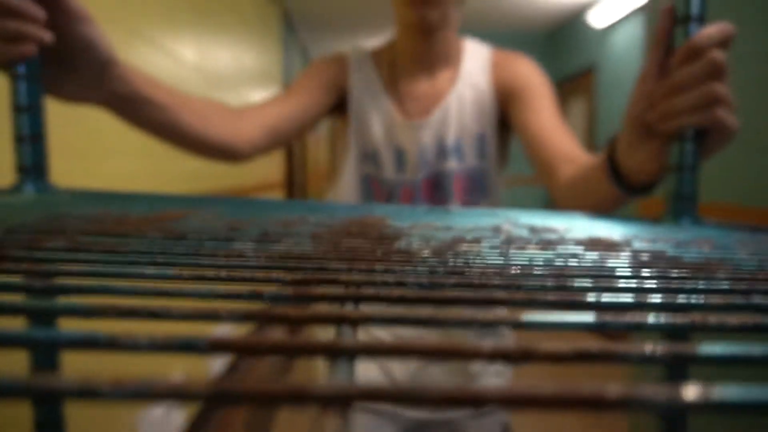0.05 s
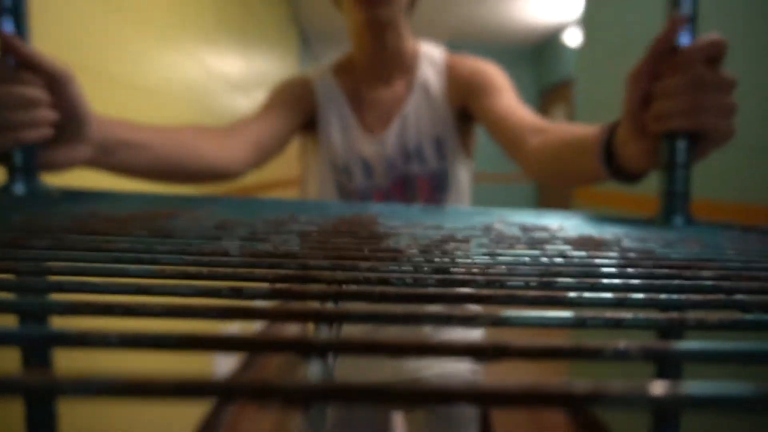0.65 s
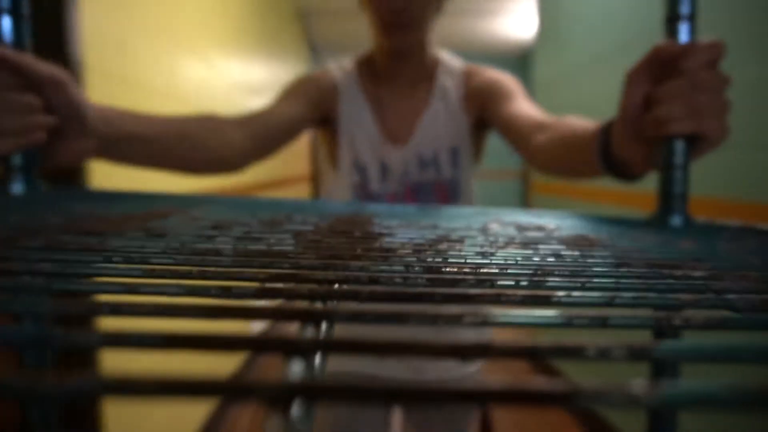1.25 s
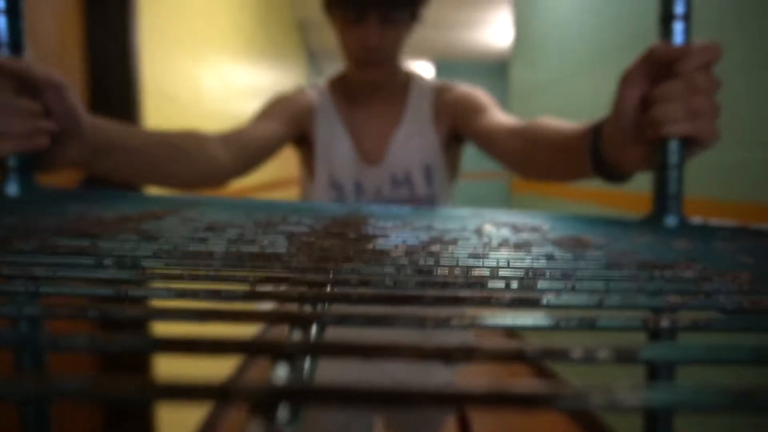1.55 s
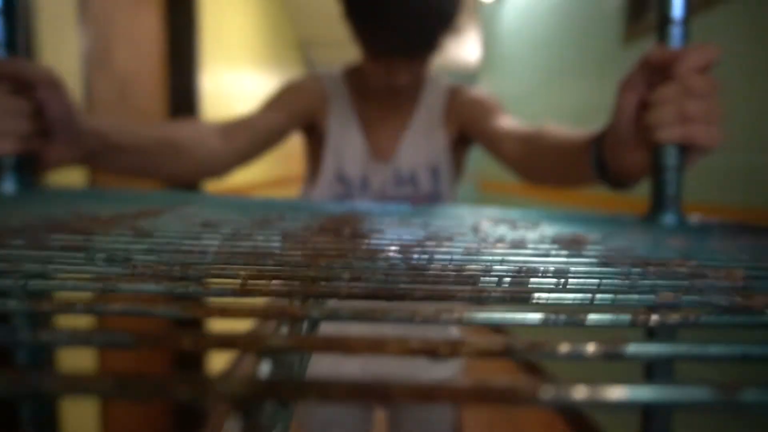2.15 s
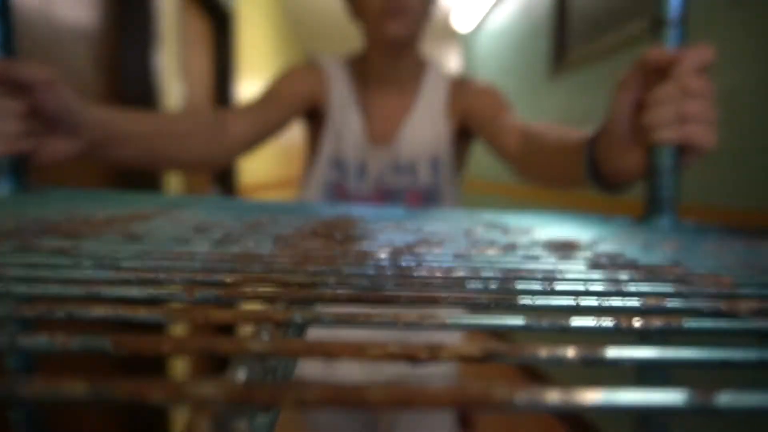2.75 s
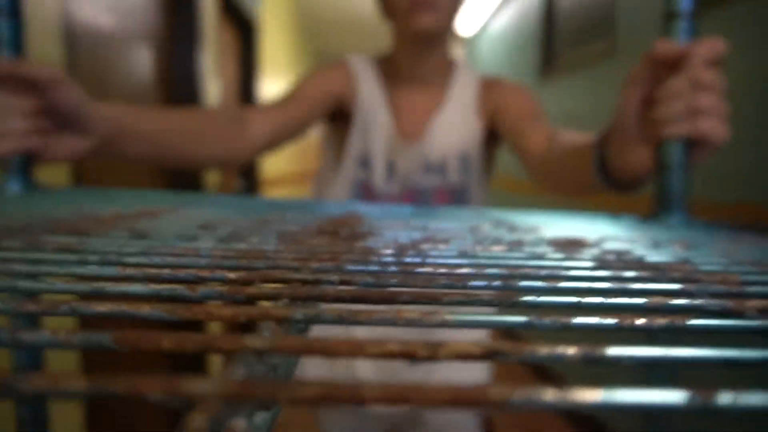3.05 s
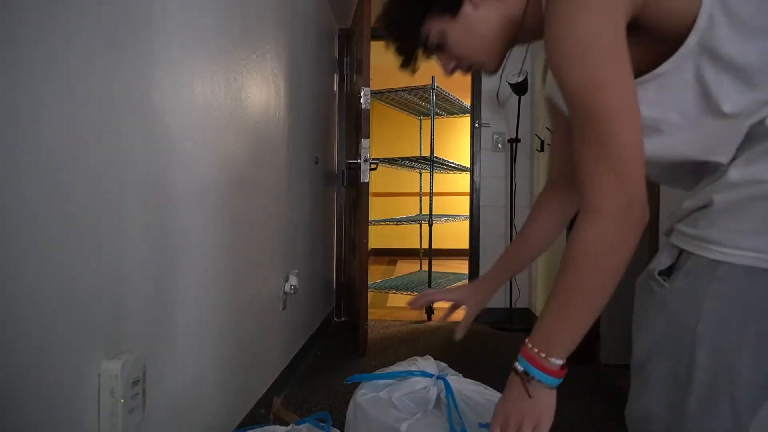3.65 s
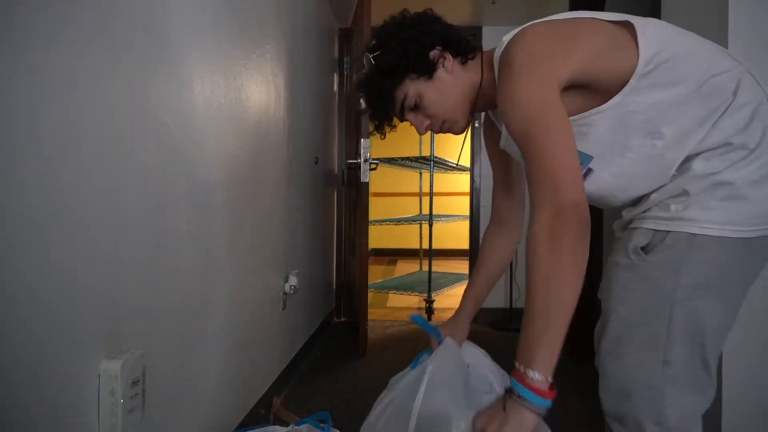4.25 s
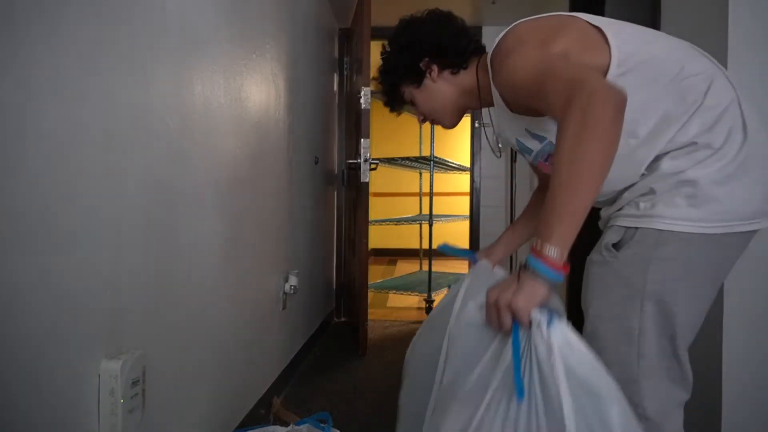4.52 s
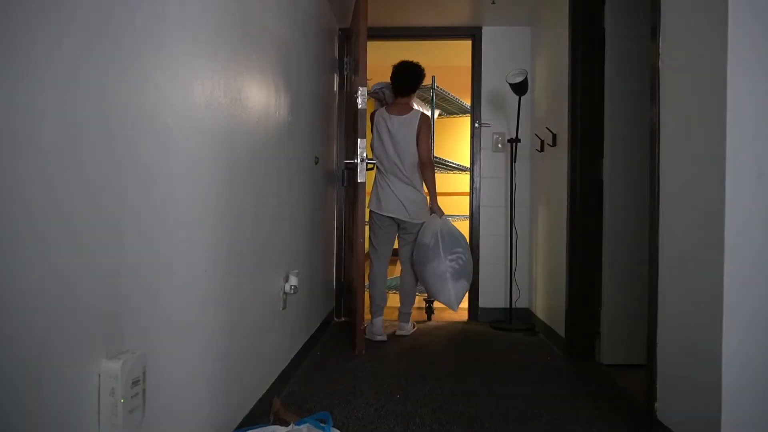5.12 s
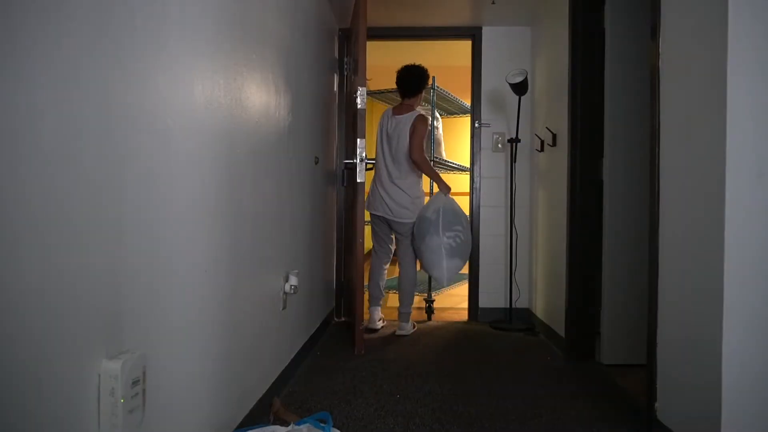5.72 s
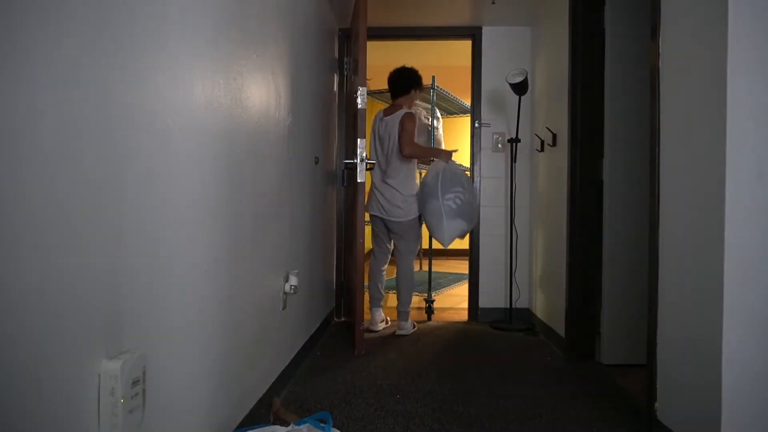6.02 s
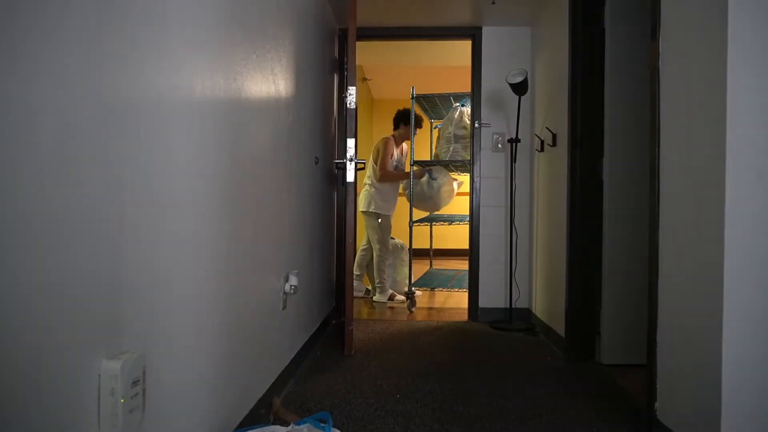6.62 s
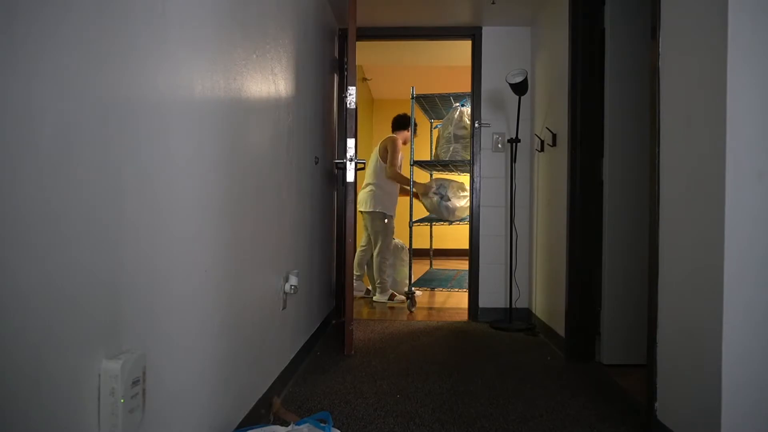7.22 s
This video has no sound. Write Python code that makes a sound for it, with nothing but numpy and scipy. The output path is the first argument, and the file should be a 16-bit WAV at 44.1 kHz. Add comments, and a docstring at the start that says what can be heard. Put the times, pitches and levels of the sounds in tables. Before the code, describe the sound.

With the microphone riding on it, a metal rack rumbles along on castors while its shelves rattle and knock irregularly. A wheel scuffs briefly and the rolling dies away. In a quiet hallway with a faint hum, a hand slaps into a full plastic bag nearby; the plastic crinkles and the load shifts with a hollow rustle. The rustling softens as the bag is carried off, then swells as it is shoved onto a lightly clinking wire shelf.

```python
"""Indoors, on an uneven floor and then in a hallway. A wire shelving rack rolls along, heard from on board:
grit jolts the castors, the frame rumbles, loose shelves chatter and knock, and thin wires jingle.
The rumble fades and a full plastic bag is grabbed close by, carried off and pushed onto a wire shelf.
Its creases crinkle and its load shifts with a hollow rustle, over soft air and a faint mains hum."""
import sys
import numpy as np
from scipy import signal
from scipy.fft import rfft, irfft
from scipy.io import wavfile
from scipy.ndimage import uniform_filter1d, minimum_filter1d

SR = 44100
rng = np.random.default_rng(int(sys.argv[2]) if len(sys.argv) > 2 else 0)


def master(y):
    """Save y as 16-bit WAV."""
    cut = np.clip(np.atleast_2d(y).T, -1, 1)
    pcm = np.round(cut * 32767)  # scale
    wavfile.write(sys.argv[1], SR, pcm.astype(np.int16))


N = 321048
T = np.arange(N) / SR

# The rumble holds steady, then fades. Each row: time in seconds, level in dB.
RUMBLE_LEVEL = [(.01, -15), (.1, -9.3), (.55, -11.5), (.95, -10.5), (1.4, -11), (2.05, -10.5), (2.7, -10.5),
                (2.95, -10), (3.42, -15), (3.6, -29.5), (3.66, -56)]
# Tone of the shaken frame. Each row: frequency in Hz, relative level in dB.
FRAME_COLOUR = [(20, -50), (33, -25), (44, -6.5), (62, -3), (102, -1.3), (124, 0.5), (198, -6),
                (250, -12.5), (325, -15), (440, -18), (540, -27), (708, -36.5), (1100, -44.5)]
# Posts and shelves bending. Each row: pitch in Hz, time to fall 60 dB in seconds, relative level in dB.
FRAME_MODES = [(44.85, 0.46, -20.5), (98.3, 0.105, -10), (119.45, 0.407, -3), (148.95, 0.288, -9),
               (202.4, 0.31, -17)]
# How hard the shelves chatter. Each row: time in seconds, level in dB.
CHATTER_LEVEL = [(0, -35.5), (.33, -32.5), (.52, -37), (.95, -32.8), (1.45, -34.2), (1.85, -35.5),
                 (2.05, -33.3), (2.75, -34.2), (3.02, -33.8), (3.4, -38.5), (3.55, -46.5)]
# Shelves tapping in their sockets. Each row: frequency in Hz, relative level in dB.
SOCKET_COLOUR = [(300, -11), (700, -3), (1000, 0.5), (1600, -2), (2000, -2.5), (2450, -6), (3000, -1),
                 (3900, -11), (4700, -8.5), (5600, -14.5), (8000, -12.5), (11000, -24.5), (15000, -31)]
# The wires jingle in swells of their own. Each row: time in seconds, level in dB.
JINGLE_LEVEL = [(.05, -43), (.33, -35.5), (.52, -41), (.72, -41.5), (.98, -36.5), (1.85, -40.5), (2.1, -37),
                (2.7, -42), (3.17, -38), (3.5, -49.5)]
# Sheen of the thin wires. Each row: frequency in Hz, relative level in dB.
WIRE_COLOUR = [(2000, -2.5), (4500, -4.5), (5600, -4.5), (7000, -1.5), (8800, -1), (10000, -4),
               (11700, -10.5), (12600, -22), (15500, -18)]
# A wire shelf ringing. Each row: pitch in Hz, time to fall 60 dB in seconds, relative level in dB.
WIRE_MODES = [(1943, 0.11, -4), (2700, .07, -3.5), (2981, 0.1, -1.5), (3440, 0.07, -1.5), (3890, .06, -4),
              (4840, 0.07, -2), (5930, 0.1, -6), (6790, .1, -6), (8090, .15, -5), (9397, 0.25, -6.5)]
# The hardest shelf knocks. Each row: start in seconds, strength in dB, brightness in Hz.
HARD_KNOCKS = [(0.168, -18, 1200), (0.233, -15.5, 2400), (0.3803, -15, 6700), (0.5785, -16, 1900),
               (0.778, -15.5, 900), (0.8016, -13.5, 3700), (0.854, -17, 3800), (0.902, -14, 1700),
               (0.9635, -16.5, 2400), (1.045, -17, 3800), (1.1765, -13.5, 3000), (1.291, -17, 5500),
               (1.5687, -13.7, 6500), (1.709, -17, 1400), (1.7439, -15, 1200), (1.8385, -15.5, 1600),
               (1.8645, -16.5, 1400), (2.04, -17, 2000), (2.056, -15.5, 1100), (2.2425, -12.3, 1900),
               (2.267, -17, 6500), (2.336, -16.5, 1210), (2.4655, -10.5, 4500), (2.531, -16, 5000),
               (2.6, -17.5, 1800), (2.6383, -17, 2200), (2.768, -17.5, 5000), (2.8322, -13, 2200),
               (2.8679, -17, 6400), (2.9015, -17, 2200)]
# Tone of a struck post. Each row: frequency in Hz, gain in dB.
POST_COLOUR = [(200, 12), (500, 4.5), (1000, 0), (2200, -1), (3000, 4), (3900, -1), (9000, 4.5),
               (15000, -6.5)]
# A castor scuffing as it swivels. Each row: time in seconds, level in dB.
SCUFF_LEVEL = [(2.9, -50), (2.99, -35), (3.05, -38.5), (3.1, -52)]
# Tone of that scuff. Each row: frequency in Hz, relative level in dB.
SCUFF_COLOUR = [(900, -14), (1500, -4), (2100, 0), (3100, -5), (4500, -18)]

# The bag is grabbed, gathered, lifted, carried and pushed in. Each row: crest in seconds,
# crinkle level in dB, load level in dB, seconds to rise 20 dB, seconds to fall 20 dB.
TUGS = [(3.6, -38, -53, .07, 0.4), (3.77, -37.5, -58, 0.09, 1.1), (3.865, -24, -27.5, 0.045, 0.24),
        (4.035, -23.5, -31.5, 0.07, 0.38), (4.25, -33, -41, 0.0549, .5), (4.4, -33.5, -39, 0.15, 0.1047),
        (4.51, -41.5, -37.5, 0.11, 0.2042), (4.62, -41, -43.5, 0.02, 0.24),
        (5.04, -42.5, -44.5, 0.02, 0.37), (5.14, -42, -48, .18, 0.43), (5.43, -33, -36, 0.39, 0.33),
        (5.93, -43.5, -50, 0.56, 0.5), (6.34, -41.3, -43, 0.25, 0.1848), (6.48, -37.5, -50, 0.21, 0.3039),
        (6.66, -43, -52, 0.18, .28), (6.875, -41, -46.5, 0.0433, 0.32), (6.95, -28.5, -35.5, 0.0778, .17),
        (7.012, -30, -37, 0.06, .2), (7.112, -29.8, -35, 0.14, 0.42)]
# Plastic film crinkling close by. Each row: frequency in Hz, relative level in dB.
NEAR_FILM_COLOUR = [(600, -30), (1100, 0.5), (1600, -2), (2400, -2), (3200, 0), (4800, -3), (5500, -2),
                    (8800, -1), (11400, -7.5), (15600, -26)]
# The same film down the hall. Each row: frequency in Hz, relative level in dB.
FAR_FILM_COLOUR = [(600, -18.5), (1100, -5), (1700, -4), (2400, -2.5), (3200, -1), (4800, -2.5), (5700, -3),
                   (8800, -4), (11400, -12.5), (13000, -24), (15600, -25)]
# Hollow rustle of the load. Each row: frequency in Hz, relative level in dB.
LOAD_COLOUR = [(100, -25), (180, -0.5), (260, -3), (400, 2.5), (550, 1), (750, 1), (1200, -5), (2000, -21),
               (4000, -31.5)]
# A hand slapping into the bag. Each row: start in seconds, peak in dB, time to fall 60 dB in seconds.
SLAPS = [(3.829, -9, 0.11), (3.8408, -1, 0.06), (3.851, -5.5, 0.026), (3.871, -12, 0.08)]
# Tone of a slap. Each row: frequency in Hz, relative level in dB.
SLAP_COLOUR = [(80, 1), (200, -5), (350, 0), (550, -6), (820, 3), (1050, 4), (1300, -4), (1750, 1.5),
               (3200, 1), (5000, 0), (9000, 0), (12000, -12), (15500, -31)]
# Single creases snapping. Each row: start in seconds, peak in dB.
SNAPS = [(3.73, -15), (3.7548, -13), (3.81, -14), (4.123, -13), (4.1589, -9.5), (4.2085, 1), (4.351, -13),
         (4.367, -14), (4.4213, -15), (4.7231, -22), (4.866, -28), (4.91, -29)]
# Tone of a snap. Each row: frequency in Hz, relative level in dB.
SNAP_COLOUR = [(300, -9.5), (700, 3.5), (1500, -4.5), (3000, -1.5), (4600, 6), (5500, -2), (7200, -4),
               (9200, 2), (12000, -13), (15500, -13.5)]
# Soft bumps of the load. Each row: start in seconds, pitch in Hz, peak in dB, seconds to fall 60 dB.
BUMPS = [(3.846, 790, -19, .045), (3.853, 348, -19, 0.12), (4.329, 696, -27, 0.05),
         (4.485, 270, -28.5, 0.26), (5.41, 301, -32, 0.39), (6.94, 238, -23, 0.36), (6.995, 288, -26, 0.26),
         (7.1, 517.5, -29, 0.57)]
# The bag nudging the wire shelf. Each row: start in seconds, strength in dB.
CLINKS = [(6.353, -28), (6.375, -30), (6.47, -28), (6.8635, -22.5), (6.888, -24), (6.965, -18.5),
          (7.11, -26)]

# Still air of the hallway. Each row: frequency in Hz, relative level in dB.
AIR_COLOUR = [(30, -19), (70, 0.5), (120, 2), (250, 0.5), (450, -2.5), (750, -5.5), (1200, -13),
              (2000, -21), (3200, -19.5), (8000, -20), (15000, -31)]
# Mains hum. Each row: pitch in Hz, typical rms level in dB.
HUM = [(119.5, -54), (241, -55)]

SURGE_DB, SURGES_PER_S = 0.5, 7.97  # the uneven floor makes the rumble swell and sag
RUMBLE_LEVELLING, LEVELLING_WINDOW_S = 0.55, 0.07
HEAVE_RUMBLE_DB, HEAVE_CHATTER_DB, HEAVE_RISE_S, HEAVE_SETTLE_S = 2, 0.6, 0.0059, 0.0455
KNOCKS_PER_S, KNOCK_OVER_CHATTER_DB, KNOCK_SPREAD_DB = 5, 12, 1.2
KNOCK_BRIGHT_HZ, KNOCK_SPREAD_OCTAVES = 1710, 0.64
BAG_START_S, BAG_FADE_IN_S = 3.55, 0.036
SWAY_FILM_DB, SWAY_LOAD_DB = -52, -55.5  # the faint rustle between tugs
SLAP_RISE_S = 0.002  # the film gives way under the hand
LOW_CUT_HZ, HIGH_CUT_HZ, LIMITER_CEILING = 39, 15800, 0.85


def rack():
    """Floor grit jolts the castors; the frame booms, and its widest swings rattle shelves and wires."""
    jolts = grains(rate=650, spread_db=3.0)
    frame = frame_boom(jolts)
    taps = shelf_taps(jolts, frame)
    wires = wire_jingle(taps)
    upset = heave()
    chatter_db = curve(CHATTER_LEVEL) + HEAVE_CHATTER_DB * upset
    rattle = (coloured(taps, SOCKET_COLOUR) * undb(chatter_db) + wires) * during(CHATTER_LEVEL, 0.065)
    rumble_db = curve(RUMBLE_LEVEL) + HEAVE_RUMBLE_DB * upset + SURGE_DB * walk(SURGES_PER_S)
    rumble = frame * undb(rumble_db) * during(RUMBLE_LEVEL, fade_s=0.03)
    return rumble + rattle + shelf_knocks() + castor_scuff()


def frame_boom(jolts):
    """Jolts set the frame ringing; the boom is levelled so the rumble stays steady."""
    boom = coloured(jolts, FRAME_COLOUR) + undb(-3.5) * ring(jolts, FRAME_MODES)
    power = uniform_filter1d(boom ** 2, int(LEVELLING_WINDOW_S * SR)) + 1e-6
    return unit(boom / np.sqrt(power) ** RUMBLE_LEVELLING)


def heave():
    """The bump behind each hard knock heaves the rack: a quick rise to one, then a settling to zero."""
    falloffs = [np.maximum((s - T) / HEAVE_RISE_S, (T - s) / HEAVE_SETTLE_S) for s, _, _ in HARD_KNOCKS]
    return np.exp(-np.min(falloffs, axis=0))


def shelf_taps(jolts, frame):
    """Each jolt clacks the shelves directly, and they tap again as the frame swings."""
    swing = unit(np.abs(frame) ** 0.865 + 0.334)
    taps = 0.71 * jolts + grains(rate=800, spread_db=2.5) * swing
    return unit(taps + 1.19 * scatter(taps, t60=0.0208))


def wire_jingle(taps):
    """Flurries of tiny contacts join the shelf taps and set the thin wires ringing."""
    contacts = grains(rate=2500, spread_db=3.0) * undb(0.62 * walk(14)) + 0.368 * taps
    contacts = unit(contacts + 0.79 * scatter(contacts, t60=0.03))
    jingle = coloured(contacts, WIRE_COLOUR) + undb(-21.5) * ring(contacts, WIRE_MODES)
    return jingle * undb(curve(JINGLE_LEVEL))


def shelf_knocks():
    """Shelves strike their posts and rebound for a few milliseconds; a softer contact is duller."""
    knocks = []
    for s, db, bright_hz in HARD_KNOCKS + light_knocks():
        band = signal.butter(1, [450, np.clip(bright_hz, 700, SR / 4)], "band", fs=SR, output="sos")
        knocks.append((s, db, signal.sosfilt(band, contact(spray=2.025, t60=0.0116))))
    return through(place(knocks), body(POST_COLOUR, size=512))


def light_knocks():
    """Chance knocks that ride above the chatter level, in rows like those of HARD_KNOCKS."""
    times, levels = np.transpose(CHATTER_LEVEL)
    starts = (np.arange(40) + rng.random(size=40)) / KNOCKS_PER_S
    force, hardness = rng.standard_normal(size=(40, 2)).T
    strength_db = np.interp(starts, times, levels) + KNOCK_OVER_CHATTER_DB + KNOCK_SPREAD_DB * force
    bright_hz = KNOCK_BRIGHT_HZ * 2 ** (KNOCK_SPREAD_OCTAVES * hardness)
    return [(s, db, hz) for s, db, hz in zip(starts, strength_db, bright_hz) if s < times[-1]]


def castor_scuff():
    """A wheel sticks and slips sideways for a moment."""
    slips = coloured(grains(rate=900, spread_db=2.5), SCUFF_COLOUR, size=512)
    return slips * undb(curve(SCUFF_LEVEL)) * during(SCUFF_LEVEL, fade_s=0.03)


def bag():
    """Creases buckle in swarms and the load shifts with each tug; the sharp hits echo in the hall."""
    creases = grains(rate=3500, spread_db=4.0) * undb(1.25 * walk(60))
    film = film_crinkle(creases)
    load = coloured(grains(rate=1500, spread_db=2.0) + 0.84 * creases, LOAD_COLOUR)
    film_gain, load_gain = tug_gains()
    rustle = film * film_gain + load * load_gain
    hits = hand_slaps() + shelf_clinks() + clicks(SNAPS, SNAP_COLOUR, spray=0.85, t60=0.012)
    return rustle + load_bumps() + hits + undb(-6.5) * through(hits, tail(t60=0.59))


def film_crinkle(creases):
    """The plastic is crisp close by; as it is carried off, the walls smear it into a hiss."""
    far_share = np.interp(T, [4.35, 4.75, 6.3], [0, 0.75, 1])
    near = coloured(creases + 1.04 * scatter(creases, t60=0.216), NEAR_FILM_COLOUR)
    far = coloured(0.5 * creases + scatter(creases, t60=0.53), FAR_FILM_COLOUR)
    return np.sqrt(1 - far_share) * near + np.sqrt(far_share) * far


def tug_gains():
    """Gains of film and load: every tug swells and dies away exponentially, and their powers add."""
    film_power, load_power = undb(SWAY_FILM_DB) ** 2, undb(SWAY_LOAD_DB) ** 2
    for s, film_db, load_db, rise_s, fall_s in TUGS:
        swell_db = -20 * np.maximum((s - T) / rise_s, (T - s) / fall_s)
        film_power = film_power + undb(film_db + swell_db) ** 2
        load_power = load_power + undb(load_db + swell_db) ** 2
    fade_in = np.clip(1 + (T - BAG_START_S) / BAG_FADE_IN_S, 0, 1)
    return np.sqrt([film_power, load_power]) * fade_in


def hand_slaps():
    """The hand drives the air out of the bag: a few bursts of collapsing film."""
    response = body(SLAP_COLOUR, size=1024)
    slaps = []
    for s, db, t60 in SLAPS:
        burst = tail(t60)
        attack = 1 - np.exp(-T[:len(burst)] / SLAP_RISE_S)
        slaps.append((s, db, signal.fftconvolve(burst * attack, response)))
    return place(slaps)


def load_bumps():
    """The load settles with a soft, dying rustle, each time in one broad hollow resonance."""
    return place((s, db, signal.fftconvolve(tail(t60), np.gradient(mode(hz, t60=0.03))))
                 for s, hz, db, t60 in BUMPS)


def shelf_clinks():
    """Brief scrapes of the bag set the wire shelf ringing."""
    scrapes = clicks(CLINKS, colour=[(1500, -13), (3000, 4.5), (9000, -1), (15000, -28)],
                     spray=3.2, t60=0.06)
    return 0.75 * scrapes + 0.16 * ring(scrapes, WIRE_MODES)


def hallway_air():
    """A soft bed of air noise whose level drifts a little."""
    return coloured(rng.standard_normal(N), AIR_COLOUR) * undb(-44 + 0.63 * walk(3.9))


def mains_hum():
    """Two faint low tones that waver in level and phase."""
    return sum(undb(db + 2.55 * walk(5)) * np.sqrt(2) * np.sin(2 * np.pi * hz * T + 0.725 * walk(6))
               for hz, db in HUM)


def grains(rate, spread_db):
    """Tiny impulses at random moments, about rate a second, a few much larger than the rest."""
    strength = np.minimum(rng.exponential(size=N), 4.1)
    fires = rng.random(N) < rate / SR
    return unit(fires * undb(spread_db * strength) * rng.choice([-1, 1], N))


def clicks(events, colour, spray, t60):
    """Sharp contacts of one colour. Each event: start in seconds, peak in dB."""
    response = body(colour, size=512)
    return place((s, db, signal.fftconvolve(contact(spray, t60), response)) for s, db in events)


def contact(spray, t60):
    """One sharp impulse followed by a short spray of smaller ones."""
    return np.concatenate([[1], spray * tail(t60)])


def tail(t60):
    """A noise burst of unit energy that falls 60 dB in t60 seconds."""
    t = T[:int(2 * t60 * SR) + 2]
    burst = rng.standard_normal(SR * 2)[:len(t)] * np.exp(-np.log(1000) * t / t60)
    return burst / np.sqrt(np.sum(burst ** 2))


def scatter(x, t60):
    """Diffuse reflections: noise that holds the energy of x and lets it die away."""
    keep = np.exp(-2 * np.log(1000) / (t60 * SR))
    return rng.standard_normal(N) * np.sqrt(signal.lfilter([1 - keep], [1, -keep], x ** 2))


def ring(x, modes):
    """Damped modes driven by x, each at its own level."""
    return through(x, sum(undb(db) * mode(hz, t60) for hz, t60, db in modes))


def mode(hz, t60):
    """Ringing of one damped mode, of unit energy."""
    t = T[:SR // 2]
    wave = np.sin(2 * np.pi * hz * t) * np.exp(-np.log(1000) * t / t60)
    return wave / np.sqrt(np.sum(wave ** 2))


def coloured(x, colour, size=8192):
    """Give x a tone colour, at an rms of one."""
    return unit(through(x, body(colour, size)))


def body(colour, size):
    """Impulse response of a tone colour, falling 20 dB an octave beyond both ends."""
    hz, db = np.transpose(colour)
    octave = np.log2(np.maximum(np.arange(size // 2 + 1) * SR / size, 1))
    beyond = np.abs(octave - np.clip(octave, np.log2(hz[0]), np.log2(hz[-1])))
    gain = undb(np.interp(octave, np.log2(hz), db) - 20 * beyond)
    cepstrum = irfft(np.log(gain))
    cepstrum[1:size // 2] *= 2  # minimum phase: nothing rings ahead of the hit
    cepstrum[size // 2 + 1:] = 0
    return irfft(np.exp(rfft(cepstrum)))


def through(x, response):
    """Sound passed through an impulse response."""
    return signal.fftconvolve(x, response)[:N]


def place(sounds):
    """Lay sounds on the timeline. Each row: start in seconds, peak in dB, sound."""
    out = np.zeros(N + 2 * SR)
    for s, db, sound in sounds:
        out[int(s * SR):][:len(sound)] += undb(db) * sound / np.abs(sound).max()
    return out[:N]


def walk(rate):
    """A drift that glides to a new random value rate times a second, at an rms of one."""
    hold = int(SR / rate)
    steps = np.repeat(rng.standard_normal(N // hold + 1), hold)
    return unit(uniform_filter1d(steps, hold)[:N])


def curve(table):
    """A fader ride: straight lines between a table's points in time."""
    return np.interp(T, *np.transpose(table))


def during(table, fade_s):
    """One while a table runs, fading to nothing outside it."""
    return np.clip(1 + np.minimum(T - table[0][0], table[-1][0] - T) / fade_s, 0, 1)


def undb(db):
    """Decibels to gain."""
    return 10 ** (np.asarray(db) / 20)


def unit(x):
    """Scale to an rms of one."""
    return x / np.sqrt(np.mean(x ** 2))


def scene():
    """The rack, then the bag, over air and hum, in mono."""
    return (rack() + bag() + hallway_air() + mains_hum())[None]


def record(dry):
    """Shed the deepest bass, limit the tallest peaks and cut the very top."""
    x = signal.sosfilt(signal.butter(5, LOW_CUT_HZ, "high", fs=SR, output="sos"), dry)
    gain = LIMITER_CEILING / np.maximum(np.abs(x), LIMITER_CEILING)
    gain = uniform_filter1d(minimum_filter1d(gain, size=257), size=257)  # ease in and out of each peak
    return signal.sosfilt(signal.ellip(10, 0.2, 80, HIGH_CUT_HZ, fs=SR, output="sos"), x * gain)


dry = scene()
out = record(dry)
master(out)
```